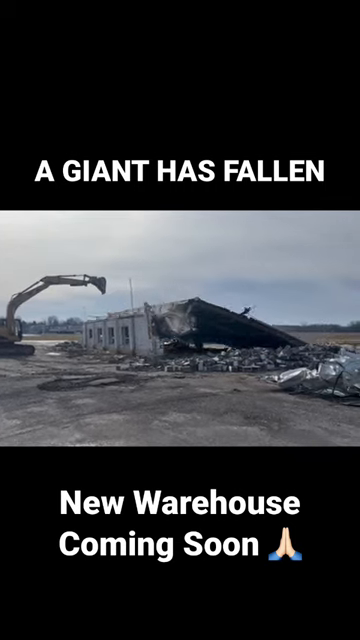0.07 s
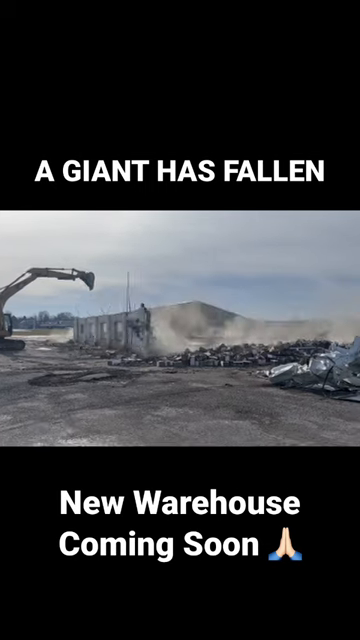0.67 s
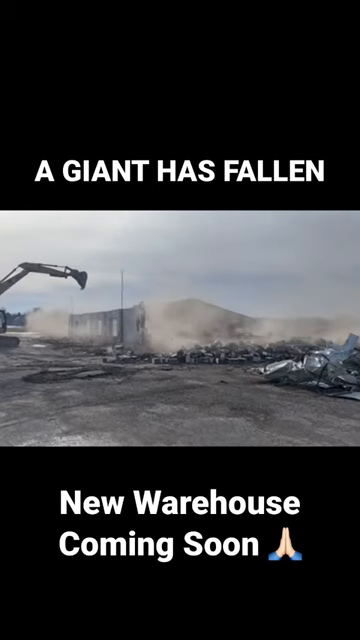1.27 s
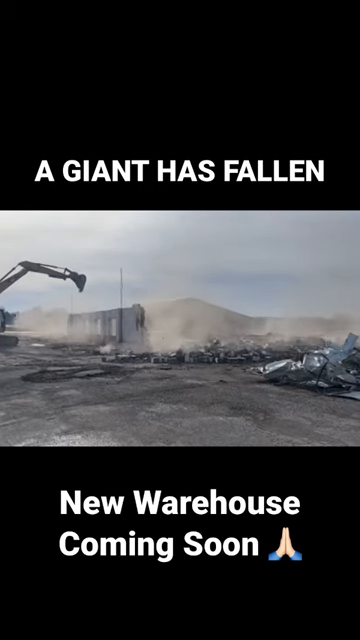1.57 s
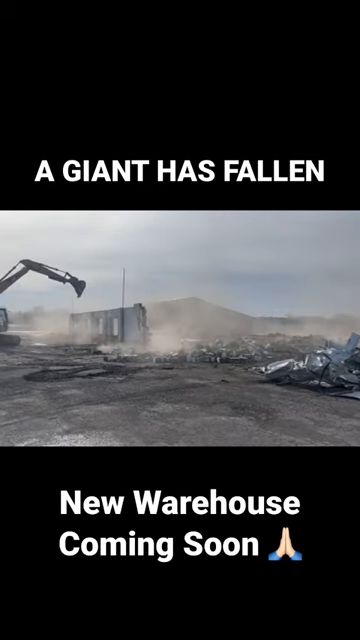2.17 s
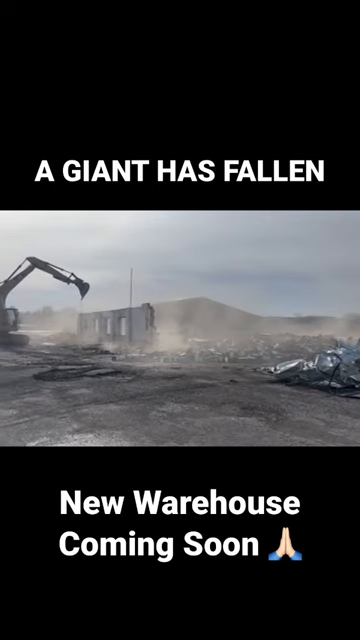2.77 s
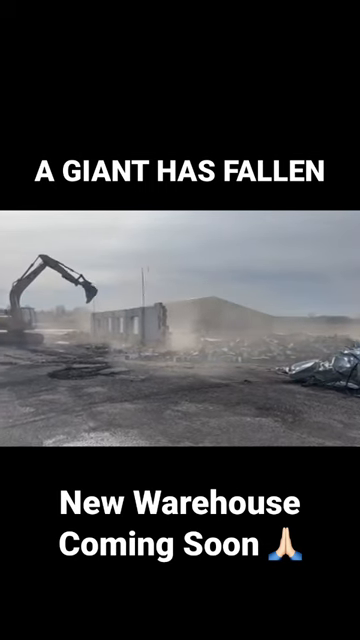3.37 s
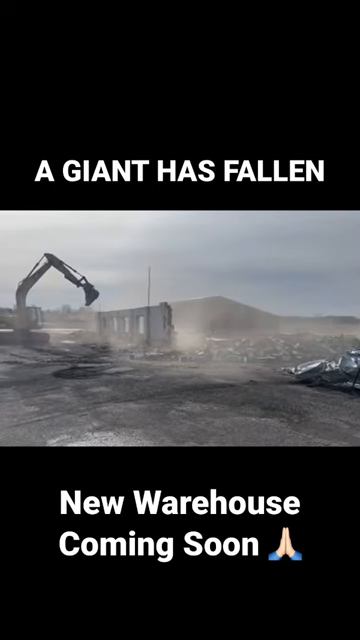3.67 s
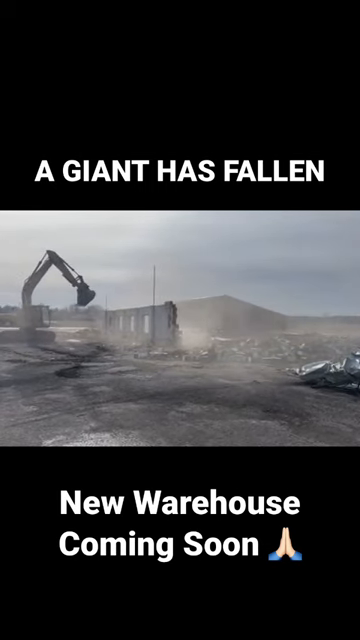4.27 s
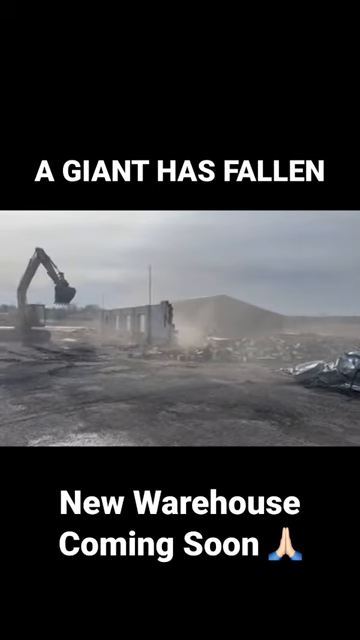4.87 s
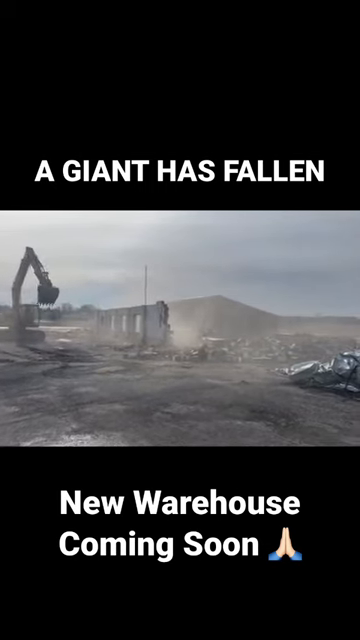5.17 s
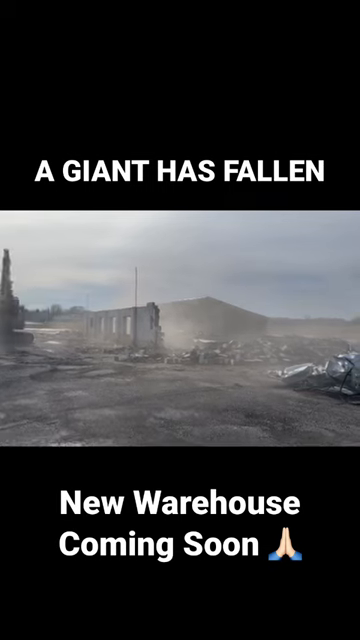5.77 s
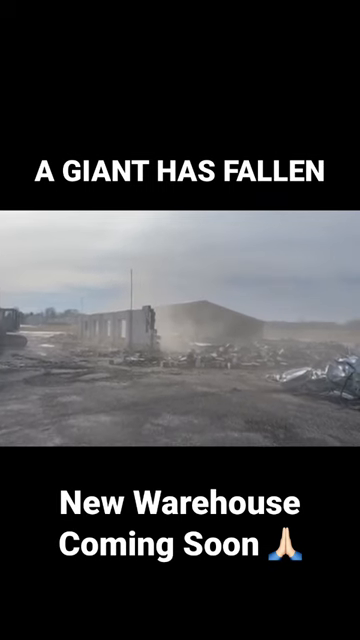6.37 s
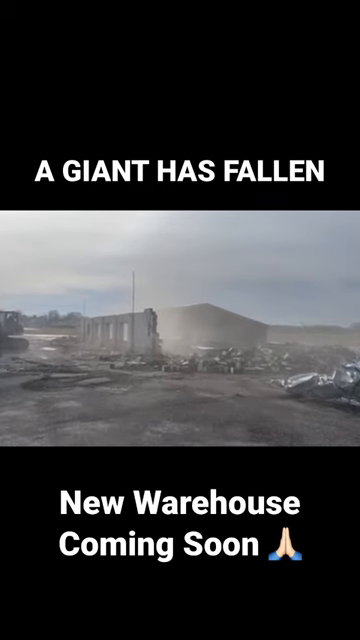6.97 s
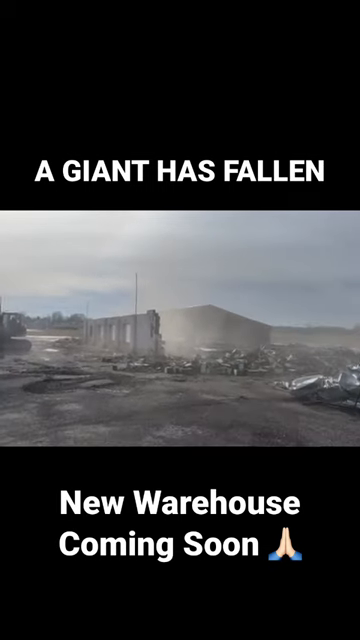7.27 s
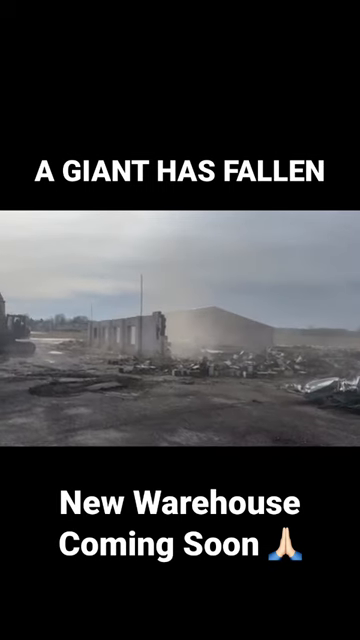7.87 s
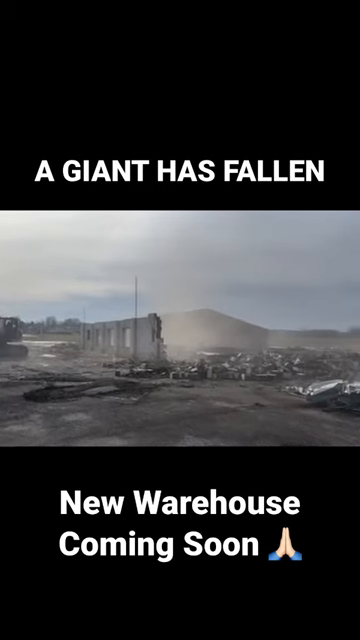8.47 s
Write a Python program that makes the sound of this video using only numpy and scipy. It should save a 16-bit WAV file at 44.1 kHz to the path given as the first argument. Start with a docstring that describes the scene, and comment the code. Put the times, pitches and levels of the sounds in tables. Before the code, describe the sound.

Steel roofing and blocks crash down, grit patters and settles, and an excavator engine runs on with hissing hydraulics and wind buffets.

```python
"""A steel-roofed warehouse collapses on an open lot: sheets slap and ring, masonry tumbles and thuds.
Scraps clink; grit and fragments keep ticking on the ground. A diesel excavator on the left revs up
and swings away: shaft harmonics, rushing air, oil singing through valves.
Wind eddies buffet the microphone, hardest near the end, over its faint steady hiss."""
import sys
import numpy as np
from scipy import signal
from scipy.fft import rfft, irfft, next_fast_len
from scipy.io import wavfile

SR = 44100
rng = np.random.default_rng(int(sys.argv[2]) if len(sys.argv) > 2 else 0)


def transcribe(u):
    """Save the signal u as a 16-bit wav file named by the first command-line argument.

    u: samples, shape (n,) or (channels, n), limited to [-1, 1]; the rate is SR.
    q: integer samples, one column per channel.
    """
    v = np.clip(np.atleast_2d(u).T, -1, 1)
    q = np.round(v * 32767).astype(np.int16)
    wavfile.write(sys.argv[1], SR, q)


N = 384993
TIME = np.arange(N) / SR
HZ = np.fft.rfftfreq(4096, 1 / SR)

# Table levels are relative. Spectra: f/Hz, density/dB
MIC_HISS_SPECTRUM = [(1000, 2), (4000, 0), (6500, 2), (8500, -3), (10200, -9), (11800, -3), (15500, -5)]
BREEZE_SPECTRUM = [(20, -42.5), (35, -5), (55, 8), (90, 6.5), (140, 1), (220, -3), (320, -11.5), (600, -69)]
ROAR_SPECTRUM = [(190, -21.5), (330, -4), (372, -2.5), (412, -6.5), (453, -5.5), (633, -5), (690, -5.5),
                 (1360, -6.5), (1640, -8), (2200, -18), (2860, -35), (4840, -120)]
HISS_SPECTRUM = [(1200, -5), (2000, 5.5), (2800, 10), (3700, 5), (4800, 2), (6100, 3), (7300, -7),
                 (9000, -10), (10300, -49), (12000, -4.5), (15000, -17.5)]
RADIATOR_SPECTRUM = [(400, -9), (750, 3), (1300, -15), (1850, 7), (2300, -0.5), (3100, 3.5), (3900, -9.5),
                     (5500, -19), (8000, -42), (15000, -54)]
GRIT_SPECTRUM = [(600, -12), (1500, 1), (2300, -1), (3100, 1), (4300, -2), (6200, 1), (8500, -1),
                 (10200, -10), (12300, -1), (15500, -8)]
PEBBLE_SPECTRUM = [(200, -13), (450, 3.5), (1400, 1.5), (2700, 3), (4500, -3.5), (9000, -42.5)]
CLACK_SPECTRUM = [(250, -37), (700, 6), (1300, 2), (2700, 1), (4000, -5), (9000, -52)]
RUMBLE_SPECTRUM = [(12, -25), (20, -19), (53, -2), (82, 1.5), (129, -2.5), (169, -3), (209, -6.5),
                   (290, -9), (354, -14), (426, -27), (600, -32.5), (780, -27), (1320, -120)]
SHEET_SPECTRUM = [(180, -25.5), (300, -4.5), (434, -6.5), (487, -7), (812, -1.5), (1140, -7), (1340, 1.5),
                  (1680, -7), (1880, -3), (3230, -15.5), (5320, -26), (6490, -24), (9000, -30.5),
                  (11700, -102), (19800, -120)]

COHERENCE = [(60, 0.58), (300, 0.87), (700, 0.45), (1500, 0.67), (3000, 0.18), (7000, 0.16), (9500, 0.0307),
             (12000, 0.13), (15000, 1)]  # left-right likeness: f/Hz, coherence
BREEZE_LEVEL = [(1.6, -54), (2.1, -56), (2.75, -47.5), (3.2, -57.5), (4.25, -56), (4.6, -53), (5.9, -52.5),
                (6.5, -47), (7.5, -45), (8.1, -45), (8.3, -50)]  # low wind: t/s, level/dB
MIC_GUSTS = [(1.893, 0.13, -36, 150), (1.935, 0.026, -32, 187), (1.951, 0.067, -40, 71),
             (2.246, 0.12, -44, 48), (2.529, .1, -37.5, 76), (2.688, 0.047, -33.5, 108),
             (2.799, 0.041, -37.5, 120), (2.942, 0.052, -36, 65), (7.481, 0.051, -32.5, 79.55),
             (7.586, 0.018, -26, 136), (7.786, 0.068, -26, 111), (7.859, 0.2, -20.5, 64.7),
             (7.939, 0.08, -24, 305), (8.071, 0.087, -20, 86), (8.13, 0.0095, -36.5, 385),
             (8.27, 0.049, -33.5, 160), (8.695, 0.031, -30, 208)]  # buffets: t/s, length/s, level/dB, f/Hz

SHAFT_SPEED = [(2.0, 23.26), (2.4, 22.47), (2.7, 22.93), (3.0, 23.62), (3.3, 23.62), (3.6, 24.25),
               (4.0, 25.1), (4.3, 25.04), (4.7, 24.85), (5.1, 24.98), (5.6, 24.86), (6.0, 25.07),
               (6.4, 25.13), (6.8, 25.39), (7.4, 25.57)]  # diesel: t/s, rotation/Hz
EXHAUST_LEVEL = [(2.05, -46), (2.42, -36), (2.95, -40), (3.15, -46), (3.45, -33.5), (3.75, -37.5),
                 (4.6, -35), (6.12, -36.5), (6.38, -39), (6.8, -33), (7.4, -35.5)]  # firing note under load: t/s, level/dB
PUMP_LOADS = [(4.05, 1.55, -48), (5.256, 2.4, -51.5), (6.423, 1.18, -40)]  # pump tone swells: peak t/s, length/s, level/dB
# weaker engine tones: shaft multiple, level/dB, idle change/dB, swing change/dB
ENGINE_ORDERS = [(5, -56, 1, 6), (6, -50, -3, 10), (7, -40, -11, -3.5), (12, -67, -6, 1), (15, -66, -7, -1),
                 (18, -65, 5, 1), (27, -66, 6.5, 1.5), (45, -72, 4, -3)]
PANEL_MODES = [(650, 86, 1.5), (1125, 120, 2.5), (1370, 77, 1.5), (1680, 260, -4.5), (2320, 175, 2),
               (3200, 300, -3.5), (4105, 300, 1.5), (5480, 200, -4), (6100, 500, 2)]  # panels and pipes, plus a ground-echo dip near 1.7 kHz: f/Hz, width/Hz, gain/dB
NEAR_ECHOES = [(4.3, .3, .16), (7.9, -.45, .18), (12.7, .5, .18), (21.4, -.4, .17)]  # off boom, tracks, walls: delay/ms, swing change/ms, gain
# oil through valves: peak t/s, length/s, level/dB, f/Hz, width/Hz, glide/(Hz/s)
VALVE_RUSHES = [(3.799, 1.25, -55.5, 1380, 300, 28), (3.9, 0.84, -66, 2430, 700, -2),
                (4.351, 0.55, -58, 2820, 700, 100), (4.549, 1.95, -57, 2260, 900, -250),
                (5.3, 0.92, -50.5, 1280, 520, -7), (5.849, 1.44, -60.5, 1880, 200, -52),
                (5.95, 1.0, -75, 14200, 1600, 0), (6.007, 1.55, -70, 3730, 350, -100),
                (6.002, 3.4, -81, 6000, 200, -70), (7.149, 1.3, -48, 1020, 485, 80),
                (7.205, 1.5, -65, 3680, 550, 0), (7.328, 0.8, -64, 5030, 800, 0),
                (7.441, 1.24, -70, 5820, 480, -150), (7.85, 0.36, -74, 5330, 505, -2)]

TRICKLE_WAVES = [(0.35, -43, 19), (2.35, -57, 20), (3.201, -71.5, 1.5)]  # sifting grit: peak t/s, level/dB, fade either side/(dB/s)
GRIT_SPRAYS = [(0.816, -49, 0.33, -1), (0.968, -35.5, 0.68, 11.5), (1.01, -22, 0.21, -1),
               (1.0779, -26.5, 0.37, -2), (1.279, -34, 0.05, 11), (1.441, -36.5, 0.2, 12.5),
               (1.5744, -27.5, 0.19, -11), (1.615, -43.5, 0.28, 15), (1.735, -30.5, 0.43, -3.5),
               (1.8397, -39, 0.44, 5), (2.047, -32.5, 0.33, 7.5), (2.07, -34.5, 0.39, -0.5),
               (2.2154, -35.5, 0.5, -6), (2.2952, -40, .18, -12), (2.346, -36, 0.15, -13),
               (2.4813, -37, 0.4, 1), (2.579, -35.5, 0.15, -3), (2.66, -42, 0.28, 0), (2.785, -41, .14, -6),
               (2.828, -36, 0.12, -16.5), (2.909, -41, 0.22, -16), (2.9746, -33.5, 0.22, -20),
               (3.135, -43, 0.13, -6), (3.2685, -42.5, 0.35, -10), (3.435, -46, 0.18, -6),
               (3.599, -47.5, 0.12, 15.5), (3.815, -48, 0.09, -5), (4.4004, -41.5, 0.53, -10)]  # large sprays landing: t/s, level/dB, t60/s, coarse over fine/dB
STEEL_CLACKS = [(1.282, -21), (7.535, -26), (7.54, -30), (7.563, -26.5), (7.575, -34)]  # loose steel: t/s, level/dB
STEEL_CLINKS = [(1.3934, -24, 1480), (1.696, -32.5, 1050), (1.8668, -28.5, 1500), (1.97, -34, 1820),
                (2.479, -35, 1490), (2.595, -35, 1410)]  # settling scraps: t/s, level/dB, f/Hz
STONE_KNOCKS = [(1.548, -27, 620), (1.812, -33, 746), (5.373, -33, 600), (7.535, -32, 719)]  # late stones: t/s, level/dB, f/Hz
# blocks landing, then dull wind bumps on the microphone near 2.7 s: t/s, level/dB, f/Hz
LOW_THUDS = [(0.016, -8, 72), (0.142, -4.5, 59), (0.185, -9, 71), (0.25, -5.5, 85.6), (0.35, -9, 48),
             (0.41, -7, 91), (0.475, -10, 193), (0.545, -13, 65), (0.556, -7, 128), (0.58, -9.5, 246),
             (0.616, -3, 224), (0.622, -6.5, 72), (0.634, -2, 167), (0.645, -5.5, 194), (0.69, -10, 60.5),
             (0.752, -7.5, 81), (0.943, -11.5, 103), (0.995, -16.5, 190), (1.06, -20, 110),
             (1.285, -29, 170), (1.464, -20.5, 115), (1.585, -27, 69.5), (2.665, -36, 251),
             (2.708, -29.5, 350), (2.738, -41, 300)]
STEEL_MODES = [(830, 50, 2.5), (930, 39, -4), (1324, 17, -10.5), (1328, 17, 15.5), (1450, 14, -4.5),
               (1455, 20, 3.5), (1877, 15.7, 4.5), (2360, 10, 10), (2500, 19.4, 2)]  # sheeting resonances: f/Hz, width/Hz, gain/dB
ROOF_SLAMS = [(0.004, -7.5, 0.27, 723), (0.025, -3.5, 0.22, 1800), (0.031, -1.5, 0.11, 1470),
              (0.038, -3, 0.07, 1730), (0.056, -6, 0.18, 1480), (0.077, -9, 0.18, 1850),
              (0.148, -0.5, 0.26, 1980), (0.175, -5.5, 0.16, 1250), (0.199, -6, 0.24, 940),
              (0.215, -3.5, 0.34, 1860), (0.25, -7, 0.29, 1230), (0.283, -12.5, 0.24, 1320),
              (0.319, -11.5, 0.13, 900), (0.387, -14, 0.2, 1860), (0.43, -11.5, 0.16, 1420),
              (0.452, -9.5, 0.29, 1900), (0.585, -10, 0.4, 1840), (0.613, -8, 0.11, 1900),
              (0.638, -11, 0.12, 1020), (0.712, -15.5, 0.29, 1540), (0.73, -18.5, 0.15, 1890),
              (0.795, -26, 0.18, 1370), (0.981, -24.5, 0.31, 810), (1.018, -22.5, 0.17, 870),
              (1.07, -22, 0.085, 766), (1.078, -17.5, 0.24, 1760), (1.312, -29, 0.12, 1500)]  # sections landing: t/s, level/dB, t60/s, f/Hz

# excavator moves: start t/s, end t/s
THROTTLE_S, SPIN_UP_S, SWING_S, VALVE_SHUT_S = (3.15, 3.66), (3.02, 4.67), (3.64, 8.02), (7.96, 8.07)
EXHAUST_FACING_S, EXHAUST_AWAY_S = (4.9, 5.8), (7.4, 8.1)
BAY_FACING_S, RADIATOR_FACING_S = (5.9, 7), (7.0, 7.8)

FALLING_S, LANDED_S, STOP_DB_PER_S = 0.225, 0.71, 81


def amp(db):
    """dB to gain."""
    return 10 ** (np.asarray(db) / 20)


def unit_rms(x):
    """Scale to rms 1."""
    return x / np.sqrt(np.mean(x ** 2) + 1e-20)


def spectrum(points, hz=HZ):
    """Table interpolated over log frequency."""
    f, value = np.transpose(points)
    return np.interp(np.log(hz + 1), np.log(f + 1), value)


def curve(points):
    """Table interpolated over time."""
    return np.interp(TIME, *np.transpose(points))


def ramp(span_s):
    """0 to 1 across the span."""
    return np.interp(TIME, span_s, [0, 1])


def swell(peak_s, length_s):
    """Raised-cosine pulse."""
    return np.cos(np.pi * np.clip((TIME - peak_s) / length_s, -.5, .5)) ** 2


def waver(hz):
    """Random drift, rms 1, hz changes a second."""
    return unit_rms(np.interp(TIME * hz, np.arange(4096), rng.standard_normal(4096)))


def add(mix, at_s, sound):
    """Mix in at at_s."""
    part = mix[:, max(round(at_s * SR), 0):][:, :sound.shape[-1]]
    part += sound[..., :part.shape[1]]


def hump_db(hz, width_hz):
    """Response of one resonance."""
    return -10 * np.log10(1 + ((HZ - hz * hz / (HZ + 1)) / width_hz) ** 2)


def modes_db(modes):
    """Peaks and dips added to a smooth spectrum."""
    return sum(db / (1 + (2 * (HZ - hz) / width_hz) ** 2) for hz, width_hz, db in modes)


def colour(x, db):
    """Minimum-phase filter, shape db on HZ; white input keeps its power."""
    log_gain = np.log(amp(np.maximum(db - db.max(), -100)))
    log_response = np.conj(signal.hilbert(np.r_[log_gain, log_gain[-2:0:-1]]))
    taps = np.fft.ifft(np.exp(log_response)).real
    return signal.oaconvolve(x, taps[None] / np.linalg.norm(taps), axes=1)[:, :x.shape[1]]


def resonate(x, hz, width_hz):
    """Resonance tracking the curve hz."""
    carrier, r = np.exp(2j * np.pi * np.cumsum(hz) / SR), np.exp(-np.pi * width_hz / SR)
    return (carrier * signal.lfilter([(1 - r) ** 2], [1, -2 * r, r * r], x / carrier)).real


def noise_pair(size, lag_ms=0, diffuse=1):
    """Stereo white noise, right side late; more diffuse, less coherent."""
    length = next_fast_len(size, True)
    hz = np.fft.rfftfreq(length, 1 / SR)
    left, other = rfft(rng.standard_normal((2, length)))
    coherence = np.clip(spectrum(COHERENCE, hz), .01, 1) ** diffuse
    delay = np.exp(-2j * np.pi * hz * lag_ms / 1000)
    right = (coherence * left + np.sqrt(1 - coherence ** 2) * other) * delay
    return irfft(np.array([left, right]), length)[:, :size]


def impacts(per_s, spread_db):
    """Random clicks; positive spread gives a few loud ones, negative a few soft."""
    sizes = amp(spread_db * np.minimum(rng.exponential(1, N), 4))
    return sizes * rng.choice([-1, 1], N) * (rng.random(N) < per_s / SR)


def clatter(per_s, spread_db, t60_s, pieces, lag_ms=0, diffuse=1):
    """Pieces struck repeatedly, each with its own dense ring."""
    t, out = np.arange(SR // 5) / SR, 0
    for _ in range(pieces):
        ring = noise_pair(len(t), lag_ms, diffuse) * amp(-60 * t / t60_s)
        strikes = np.pad(impacts(per_s / pieces, spread_db), (len(t) - 1, 0), "wrap")
        out = out + signal.oaconvolve(strikes[None], ring, "valid", axes=1)
    return unit_rms(out)


def mic_hiss():
    """Faint steady microphone hiss."""
    return amp(-83 + .8 * waver(hz=14)) * colour(noise_pair(N), spectrum(MIC_HISS_SPECTRUM))


def wind():
    """Lumpy low breeze, eddies over the microphone."""
    breeze_db = curve(BREEZE_LEVEL) + 12.5 + 2 * waver(hz=15)
    out = amp(breeze_db) * colour(noise_pair(N, lag_ms=0.25), spectrum(BREEZE_SPECTRUM))
    for at_s, length_s, db, hz in MIC_GUSTS:
        size = int((max(length_s, .01) + 0.0062) * SR)
        top_hz = hz + 205 * 2 ** ((db + 28) / 9.5)  # stronger gusts shed finer eddies
        band_db = -10 * np.log10((1 + (HZ / top_hz) ** 10) * (1 + (40 / (HZ + 1)) ** 8))
        eddies = colour(noise_pair(size + 4096, diffuse=0.93), hump_db(hz, 0.48 * hz) + band_db)
        add(out, at_s - .006, amp(db) * unit_rms(eddies[:, -size:] * signal.windows.tukey(size, .3)))
    return out


def echoed(x):
    """Add near echoes; paths shift with the swing."""
    swing, out = ramp(SWING_S), x
    for delay_ms, change_ms, gain in NEAR_ECHOES:
        sent_s = TIME - (delay_ms + change_ms * swing) / 1000
        out = out + gain * np.array([np.interp(sent_s, TIME, side) for side in x])
    return out


def hydraulics(sputter_db=1.2, sputter_hz=140):
    """Valves open and shut smoothly; oil sputters in bands that drift with pressure."""
    out = np.zeros((2, N))
    for peak_s, length_s, db, hz, width_hz, glide_hz_per_s in VALVE_RUSHES:
        t = np.arange(int(length_s * SR)) / SR - length_s / 2
        rush = unit_rms(resonate(noise_pair(len(t), lag_ms=0.42), hz + glide_hz_per_s * t, width_hz))
        add(out, peak_s - length_s / 2, amp(db) * rush * np.hanning(len(t)))
    return echoed(out) * unit_rms(amp(sputter_db * waver(sputter_hz))) * amp([[1], [-1]])


def duty_gain(db, idle_db, swing_db, wake_s=THROTTLE_S, turn_s=SWING_S):
    """Working level, offset at idle and by the swing."""
    return amp(db + idle_db * (1 - ramp(wake_s)) + swing_db * ramp(turn_s))


def engine_tones(lag_ms, jitter=.003, flutter_db=.8):
    """Six cylinders fire three times a turn; a seven-blade fan and nine-piston pump share the shaft."""
    shaft_hz = curve(SHAFT_SPEED)
    turns = np.cumsum(shaft_hz * (1 + jitter * waver(hz=78.7))) / SR
    turns = turns - shaft_hz * np.array([[0], [lag_ms / 1000]])
    pump = amp(-53) * ramp(SPIN_UP_S)
    pump += sum(amp(db) * swell(peak_s, length_s) for peak_s, length_s, db in PUMP_LOADS)
    orders = [(3, amp(curve(EXHAUST_LEVEL))), (9, pump)]
    for order, db, idle_db, swing_db in ENGINE_ORDERS:
        orders.append((order, duty_gain(db, idle_db, swing_db, SPIN_UP_S, EXHAUST_FACING_S)))
    tones = 0
    for order, gain in orders:
        flutter = amp(1.5 + flutter_db * waver(hz=7))  # moving air
        tones += gain * flutter * np.sin(2 * np.pi * (order * turns + rng.random()))
    return tones * amp(-20 * ramp(EXHAUST_AWAY_S)) * amp([[-.5], [.5]])


def excavator(lag_ms=0.38):
    """Engine tones, panel-coloured roar and hiss; radiator air as the rear comes round."""
    tones, panels_db = engine_tones(lag_ms), modes_db(PANEL_MODES)
    roar = colour(noise_pair(N, lag_ms), spectrum(ROAR_SPECTRUM) + panels_db)
    roar *= duty_gain(-48, idle_db=-5.5, swing_db=3.5, turn_s=BAY_FACING_S)
    hiss = colour(noise_pair(N, lag_ms), spectrum(HISS_SPECTRUM) + panels_db) * amp([[1.7], [-1.7]])
    hiss *= duty_gain(-60.5, idle_db=0, swing_db=4) * amp(-6 * ramp(VALVE_SHUT_S))
    radiator = colour(noise_pair(N, lag_ms=0.39), spectrum(RADIATOR_SPECTRUM))
    radiator *= amp(-51.5) * ramp(RADIATOR_FACING_S)
    return tones + echoed(roar + hiss + radiator) * amp(.3 * waver(hz=11))


def spray(t60_s, rise_s=0.0022):
    """Envelope of grit landing: most at once, then stragglers."""
    t = np.arange(SR // 2) / SR
    return amp(-60 * t / t60_s) * (1 - np.exp(-t / rise_s))


def fragments(envelope, per_s=120, range_hz=(2000, 7000), t60_s=.035):
    """Brick and tile chips, each ringing at its own pitch."""
    t, out = np.arange(SR // 16) / SR, np.zeros((2, N))
    for at in np.flatnonzero(rng.random(N) < per_s / SR):
        hz, phase = np.exp(rng.uniform(*np.log(range_hz))), rng.uniform(0, np.pi, (2, 1))
        ring = amp(-60 * t / t60_s) * (1 - np.exp(-t * hz / 2)) * np.sin(2 * np.pi * hz * t + phase)
        add(out, at / SR, envelope[at] * ring / np.linalg.norm(ring[0]))
    return out * amp(-14) * np.sqrt(SR / per_s)


def grit(small_sprays_per_s=25):
    """Grains tick on the ground in a thinning trickle and sudden sprays."""
    fine, coarse = np.zeros((1, N)), np.zeros((1, N))
    for at_s, db, t60_s, coarse_db in GRIT_SPRAYS:
        landing = amp(db - 13.5) * spray(t60_s)
        add(fine, at_s, landing)
        add(coarse, at_s, landing * amp(coarse_db))
    trickle = sum(amp(db - db_per_s * abs(TIME - peak_s)) for peak_s, db, db_per_s in TRICKLE_WAVES)
    onsets = 1. * (rng.random(N) < small_sprays_per_s / SR)
    small_sprays = trickle * amp(-11) * signal.oaconvolve(onsets, spray(t60_s=0.097))[:N]
    fine = np.sqrt(fine ** 2 + trickle ** 2 + small_sprays ** 2)
    coarse = np.hypot(coarse, amp(12) * small_sprays)
    sand = clatter(per_s=2700, spread_db=1, t60_s=0.006, pieces=3)
    ticks = amp(-15.5) * clatter(per_s=200, spread_db=3.5, t60_s=.004, pieces=4)
    shards = amp(-6) * clatter(per_s=150, spread_db=3.5, t60_s=0.09, pieces=3)
    pebbles = clatter(per_s=920, spread_db=-4.5, t60_s=0.018, pieces=2)
    chips = amp(-3) * clatter(per_s=110, spread_db=3.5, t60_s=0.0035, pieces=4)
    grains = fine * (sand + ticks + shards) + trickle * ramp((LANDED_S, 1.5)) * chips
    return (colour(grains, spectrum(GRIT_SPECTRUM)) + fragments(np.hypot(fine, coarse)[0])
            + coarse * colour(pebbles, spectrum(PEBBLE_SPECTRUM)))


def scraps(clack_t60_s=0.027, clink_t60_s=0.19):
    """Loose steel: dry clacks, briefly ringing clinks."""
    out, t = np.zeros((2, N)), np.arange(SR // 8) / SR
    for at_s, db in STEEL_CLACKS:
        clack = colour(noise_pair(len(t)) * amp(-60 * t / clack_t60_s), spectrum(CLACK_SPECTRUM))
        add(out, at_s, amp(db - 7) * clack / abs(clack).max())
    for at_s, db, hz in STEEL_CLINKS:
        clink = colour(noise_pair(len(t)) * amp(-60 * t / clink_t60_s), hump_db(hz, width_hz=150))
        add(out, at_s, amp(db - 5) * clink / abs(clink).max())
    return out


def collapse(peak_db, start_db, sag_db_per_s, settle_db, settle_s):
    """Envelope: the fall builds, sags, stops on landing; the wreck settles 20 dB in settle_s."""
    down_s = np.maximum(TIME - LANDED_S, 0)
    fall_db = peak_db - sag_db_per_s * np.maximum(TIME - FALLING_S, 0) - STOP_DB_PER_S * down_s
    fall_db += (start_db - peak_db) * (1 - ramp((0, FALLING_S)) ** 4)
    settling = ramp((0, LANDED_S)) * amp(settle_db - 20 * (down_s / settle_s) ** 2)
    return np.hypot(amp(fall_db), settling)


def blows(rows, cycles, gain_db):
    """Dull bumps: noise in one broad resonance, gone in a few cycles."""
    out, t = np.zeros((2, N)), np.arange(SR // 4) / SR
    for at_s, db, hz in rows:
        burst = noise_pair(len(t), diffuse=0.079) * np.exp(-t * hz / cycles)
        lowpass_db = -10 * np.log10(1 + (HZ / (2.1 * hz)) ** 10)
        blow = colour(burst, 2 * hump_db(hz, 0.75 * hz) + lowpass_db)
        add(out, at_s, amp(db + gain_db) * blow / abs(blow).max())
    return out


def masonry():
    """Blocks tumble and thud, stones knock later; the thuds near 2.7 s are wind on the microphone."""
    blocks = clatter(per_s=500, spread_db=1, t60_s=0.048, pieces=12, diffuse=0.034)
    rumble = unit_rms(colour(blocks, spectrum(RUMBLE_SPECTRUM)))
    fall = collapse(peak_db=-14, start_db=-19.5, sag_db_per_s=14.5, settle_db=-27, settle_s=0.96)
    lows = fall * rumble + blows(LOW_THUDS, cycles=1.76, gain_db=-1.5)
    return lows * amp([[-.7], [.7]]) + blows(STONE_KNOCKS, cycles=1.2, gain_db=-1)


def roof(mode_width_hz=45, mode_db=5, rise_s=0.00065):
    """Steel sheets buckle and slap; whole sections slam down, each with its own modes."""
    sheets = clatter(per_s=400, spread_db=-0.5, t60_s=0.15, pieces=16, lag_ms=0.065, diffuse=0.6)
    fall = collapse(peak_db=-19, start_db=-20, sag_db_per_s=16.5, settle_db=-37, settle_s=1.29)
    out, t = fall * sheets, np.arange(SR // 2) / SR
    for at_s, db, t60_s, hz in ROOF_SLAMS:
        modes = [(hz * ratio, mode_width_hz, mode_db) for ratio in rng.uniform(.6, 1.7, size=7)]
        section_db = np.maximum(hump_db(hz, width_hz=420), -13) + np.minimum(modes_db(modes), mode_db)
        crash = colour(noise_pair(len(t), lag_ms=0.075, diffuse=0.15), section_db)
        crunch = unit_rms(amp(2.5 * waver(hz=260)))[:len(t)]  # metal yields in jerks
        envelope = amp(db - 15.5 - 60 * t / t60_s) * (1 - np.exp(-t / rise_s))
        add(out, at_s, envelope * crunch * crash)
    return colour(out, spectrum(SHEET_SPECTRUM) + modes_db(STEEL_MODES)) * amp([[-.8], [.8]])


def scene():
    """Open lot: all sources summed."""
    return roof() + masonry() + scraps() + grit() + excavator() + hydraulics() + wind() + mic_hiss()


def record(dry, low_hz=30, ceiling=.92, top_hz=15700):
    """Microphone: bass cut, soft clip, band limit."""
    cut = signal.sosfilt(signal.butter(2, low_hz, "highpass", fs=SR, output="sos"), dry)
    clipped = cut / (1 + (cut / ceiling) ** 8) ** (1 / 8)
    taps = signal.firwin(511, top_hz, window=("kaiser", 9), fs=SR)
    return signal.oaconvolve(clipped, taps[None], "same", axes=1)


dry = scene()
out = record(dry)
transcribe(out)
```